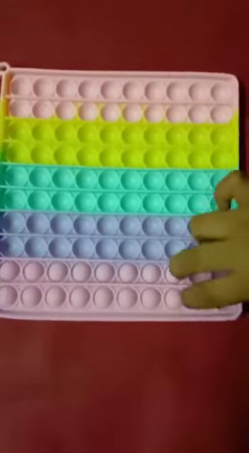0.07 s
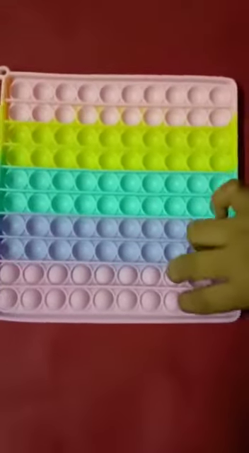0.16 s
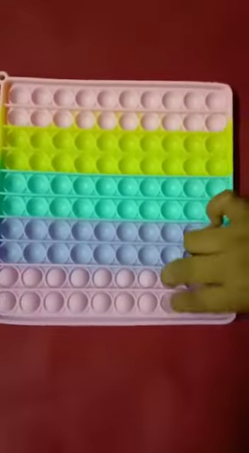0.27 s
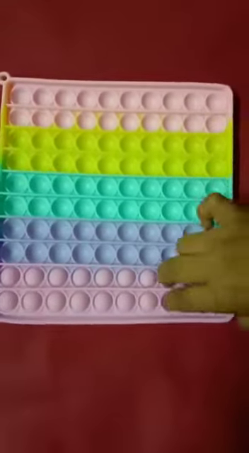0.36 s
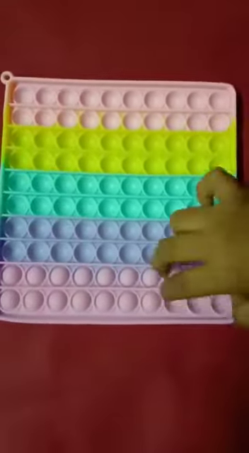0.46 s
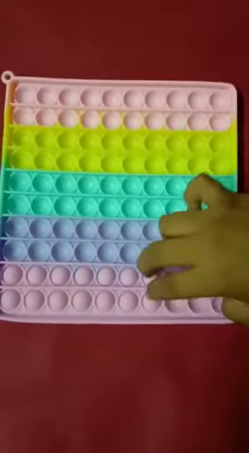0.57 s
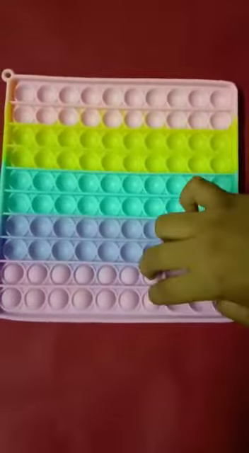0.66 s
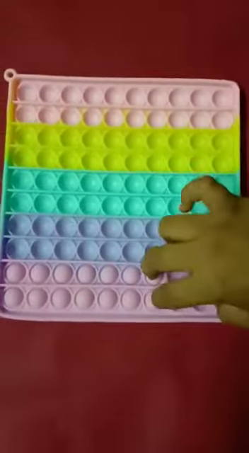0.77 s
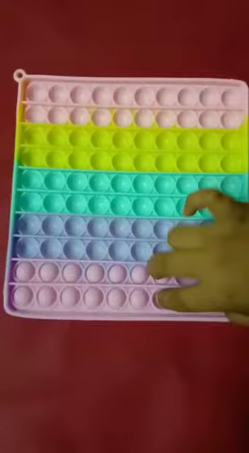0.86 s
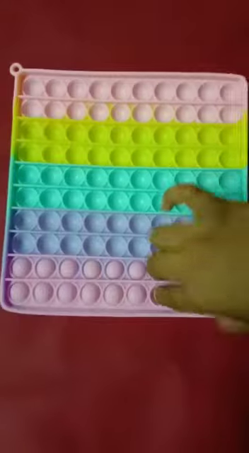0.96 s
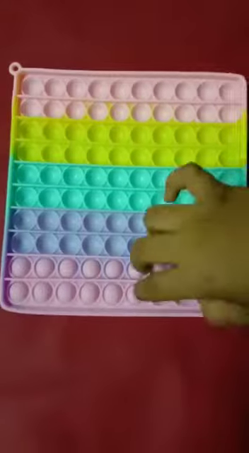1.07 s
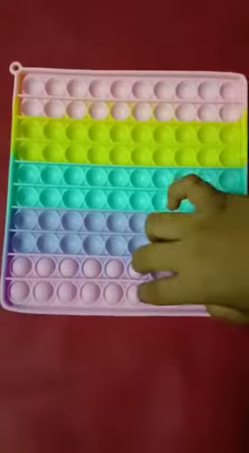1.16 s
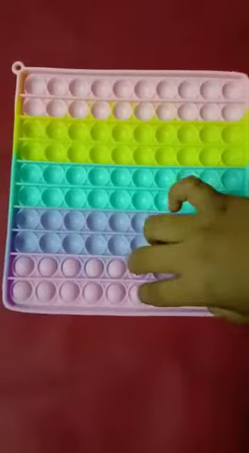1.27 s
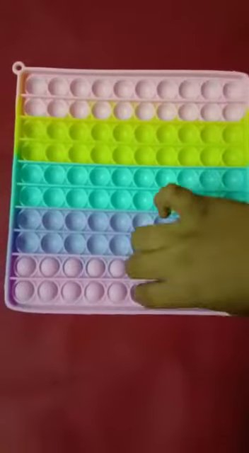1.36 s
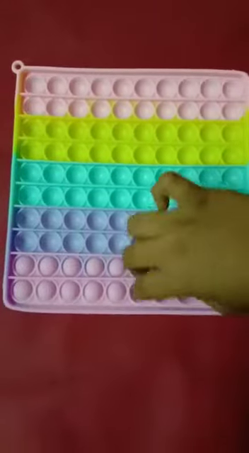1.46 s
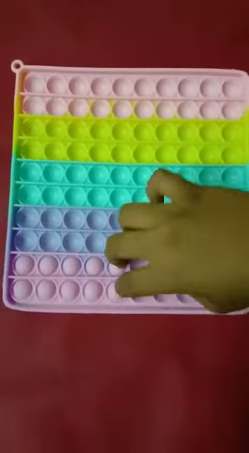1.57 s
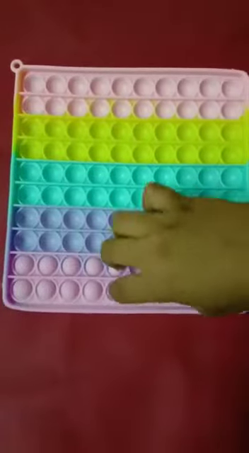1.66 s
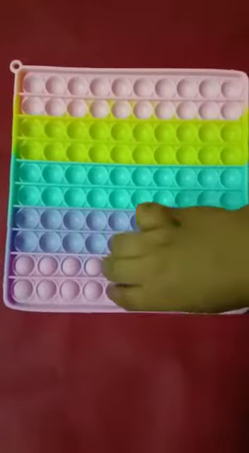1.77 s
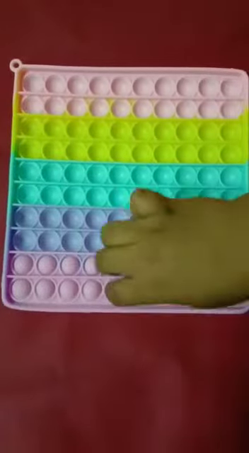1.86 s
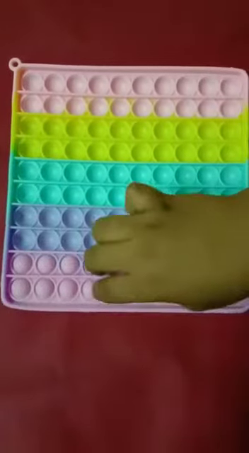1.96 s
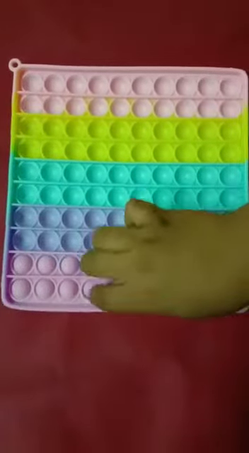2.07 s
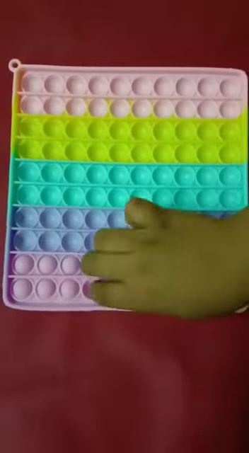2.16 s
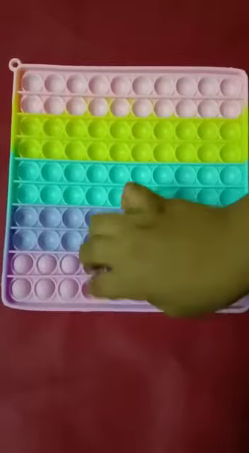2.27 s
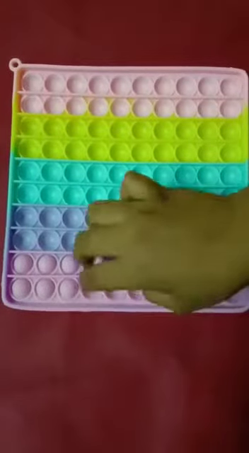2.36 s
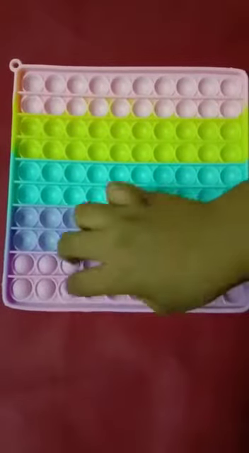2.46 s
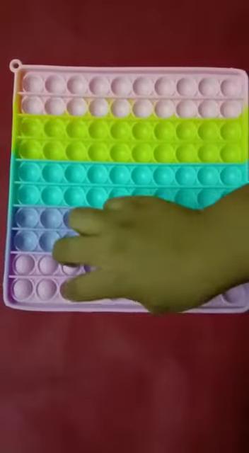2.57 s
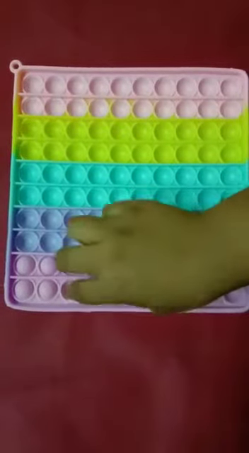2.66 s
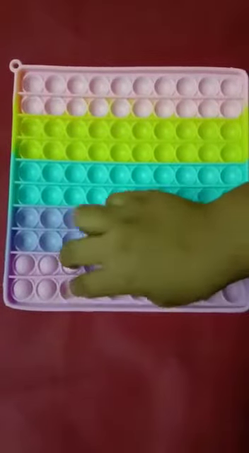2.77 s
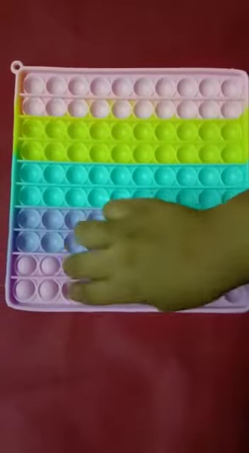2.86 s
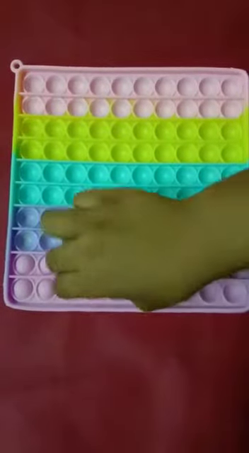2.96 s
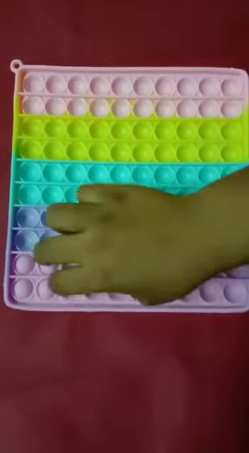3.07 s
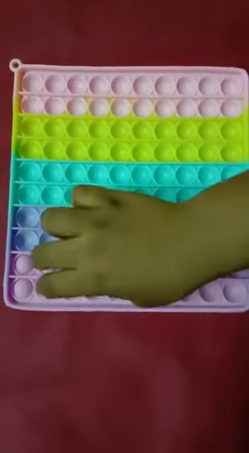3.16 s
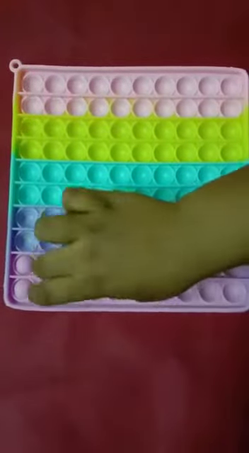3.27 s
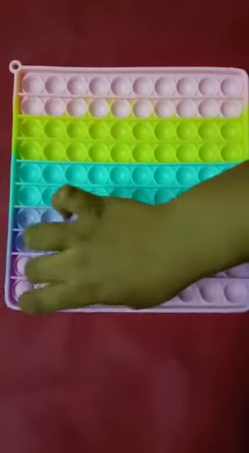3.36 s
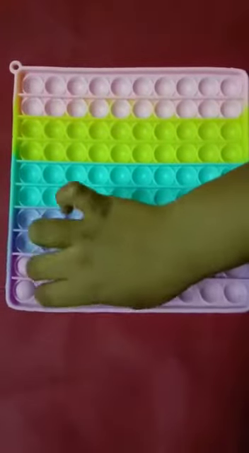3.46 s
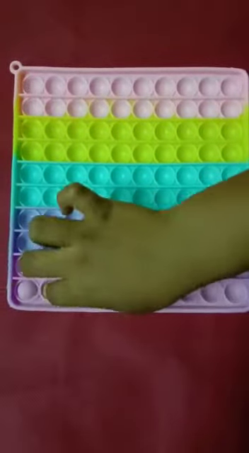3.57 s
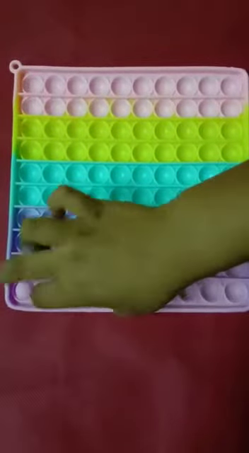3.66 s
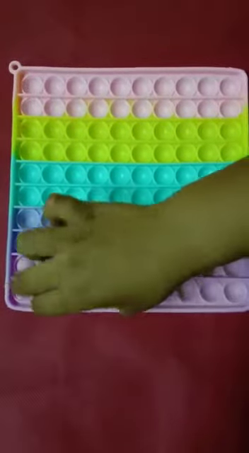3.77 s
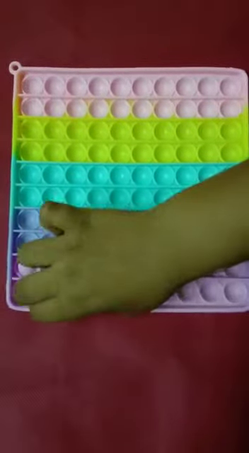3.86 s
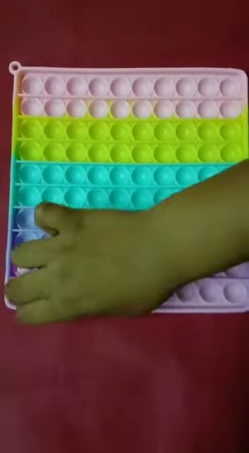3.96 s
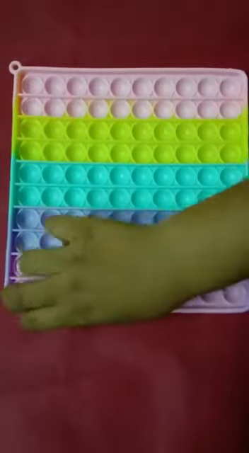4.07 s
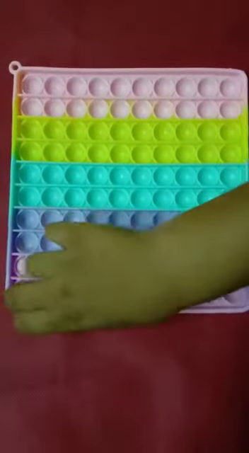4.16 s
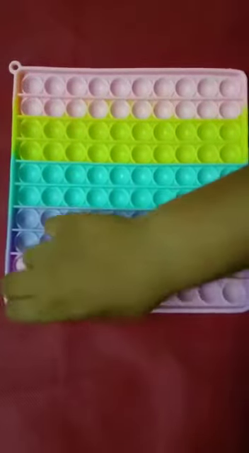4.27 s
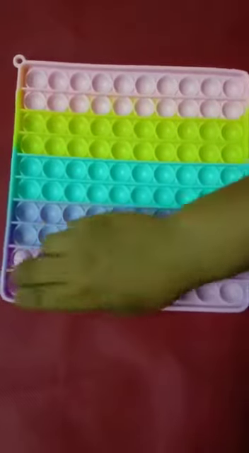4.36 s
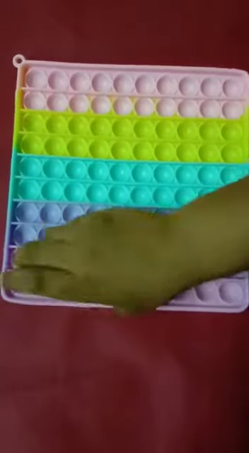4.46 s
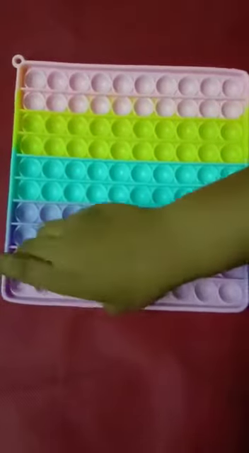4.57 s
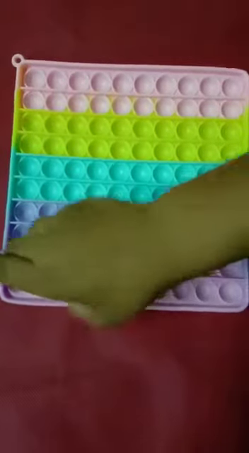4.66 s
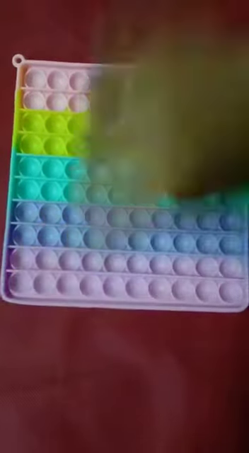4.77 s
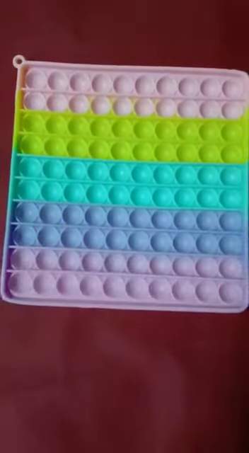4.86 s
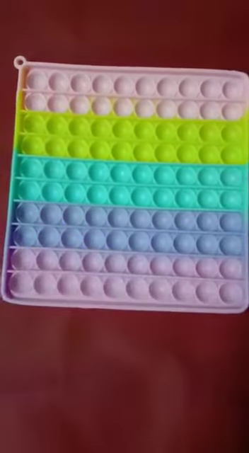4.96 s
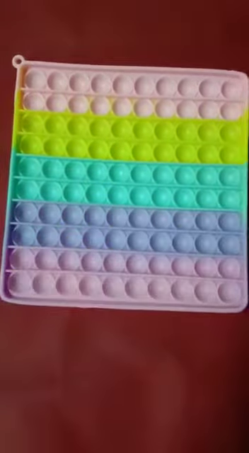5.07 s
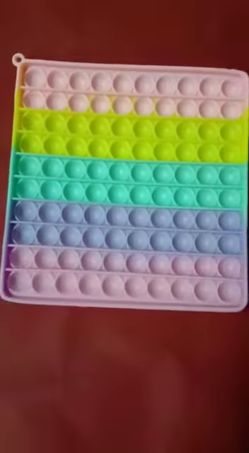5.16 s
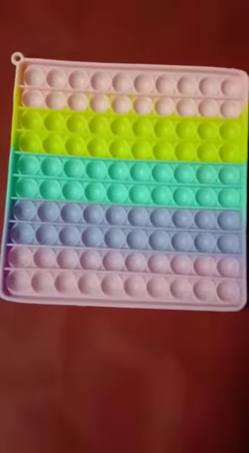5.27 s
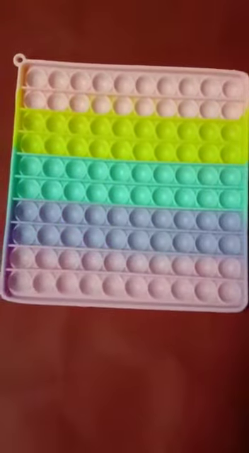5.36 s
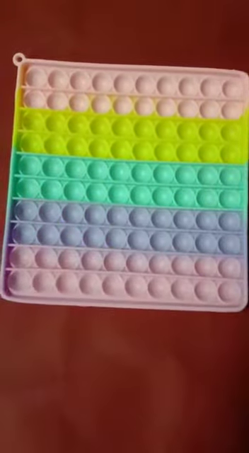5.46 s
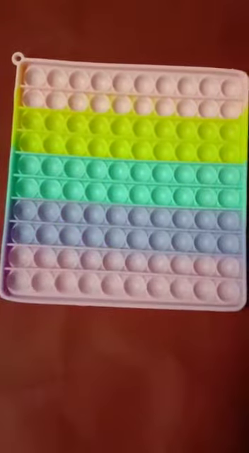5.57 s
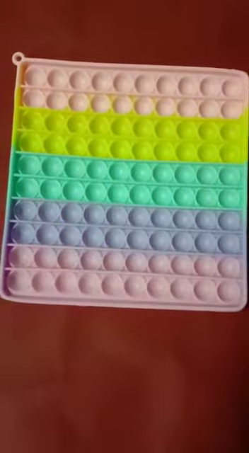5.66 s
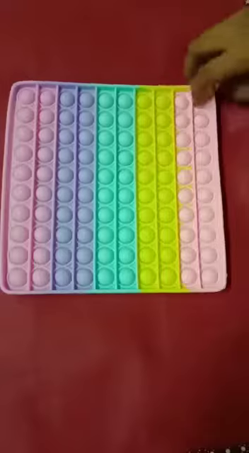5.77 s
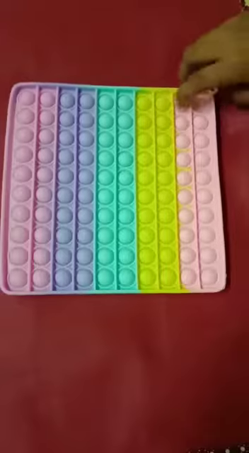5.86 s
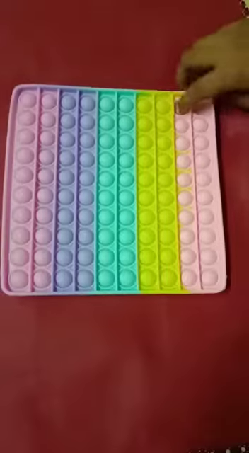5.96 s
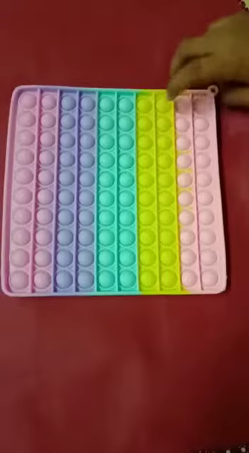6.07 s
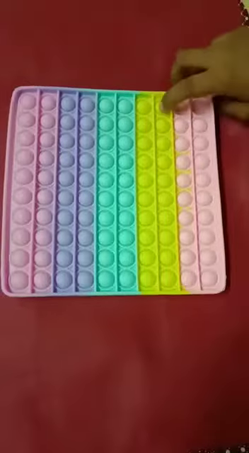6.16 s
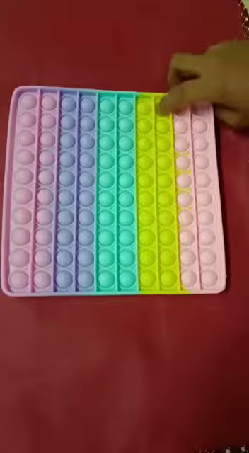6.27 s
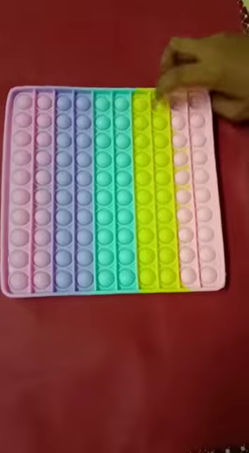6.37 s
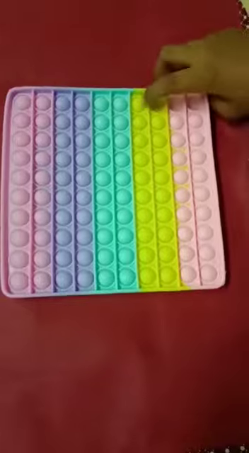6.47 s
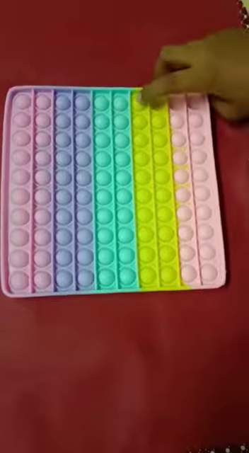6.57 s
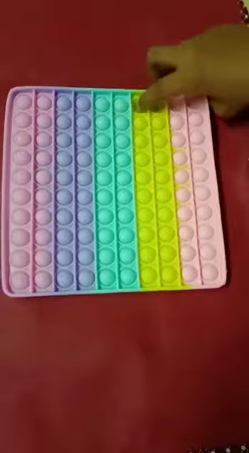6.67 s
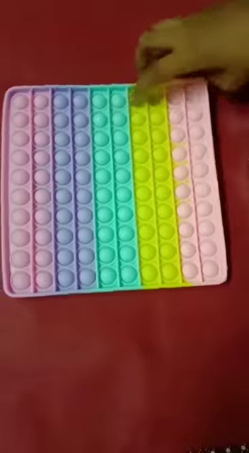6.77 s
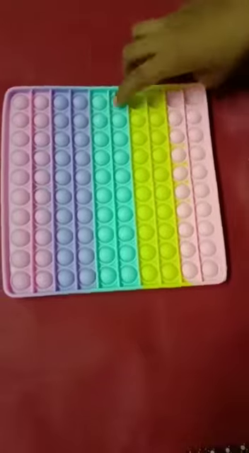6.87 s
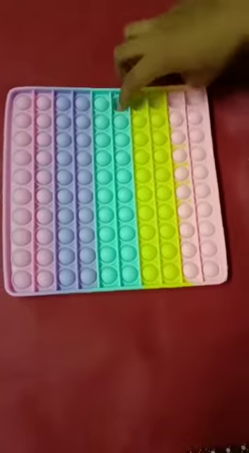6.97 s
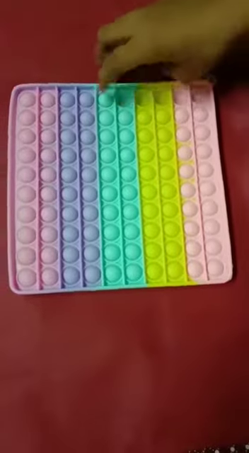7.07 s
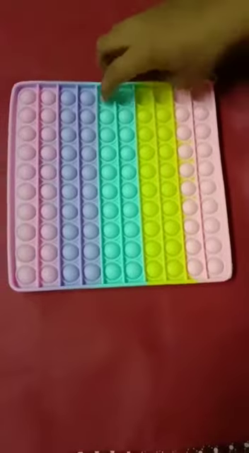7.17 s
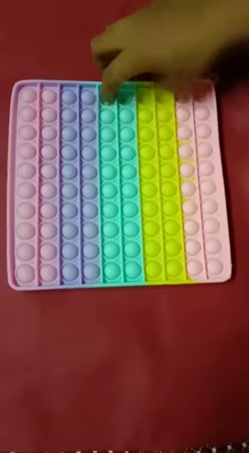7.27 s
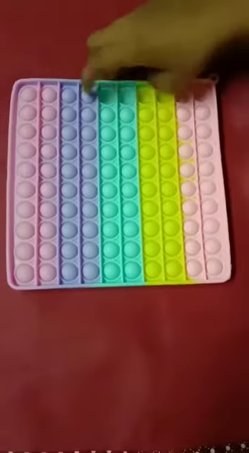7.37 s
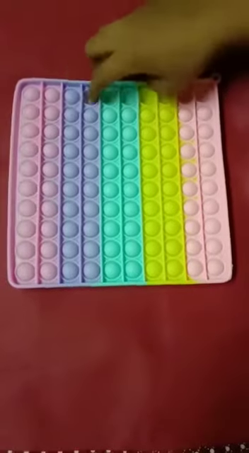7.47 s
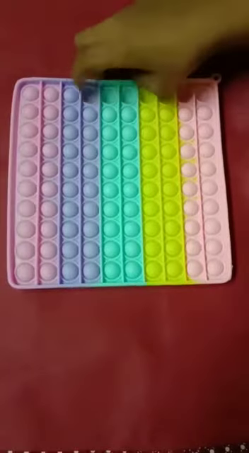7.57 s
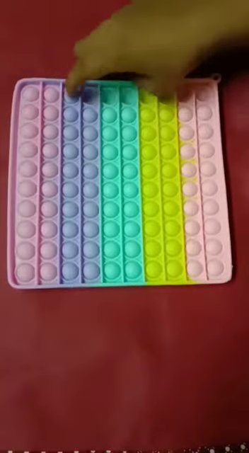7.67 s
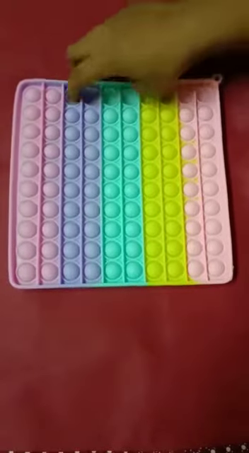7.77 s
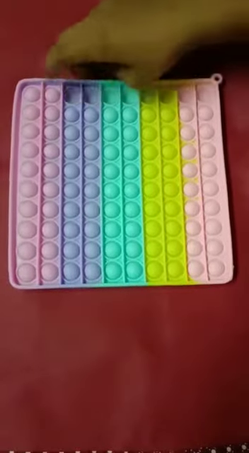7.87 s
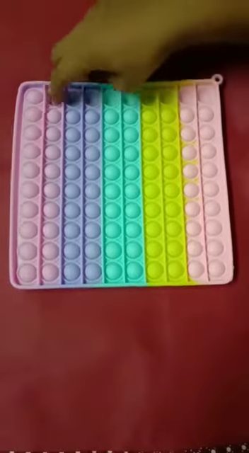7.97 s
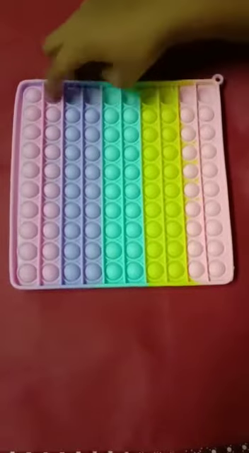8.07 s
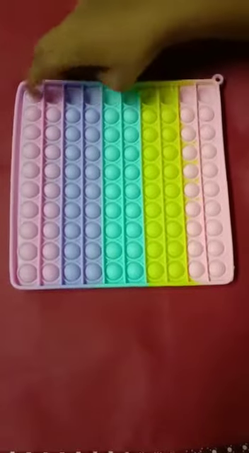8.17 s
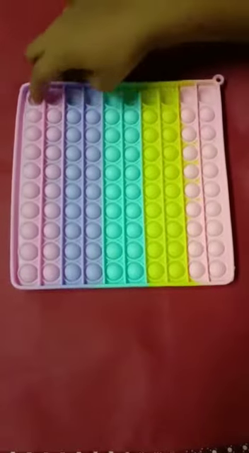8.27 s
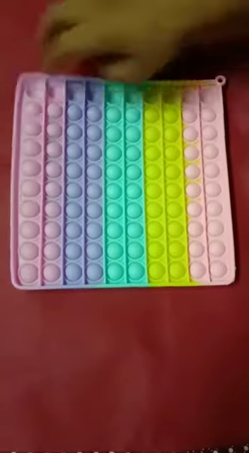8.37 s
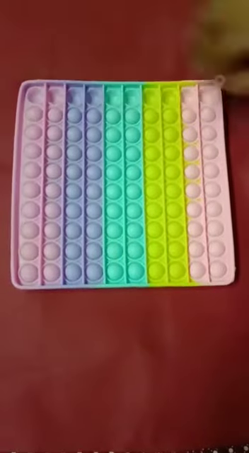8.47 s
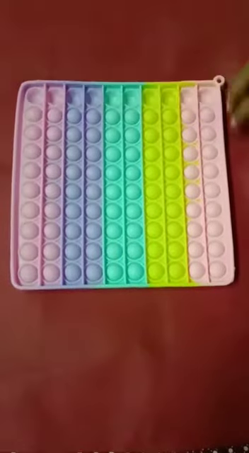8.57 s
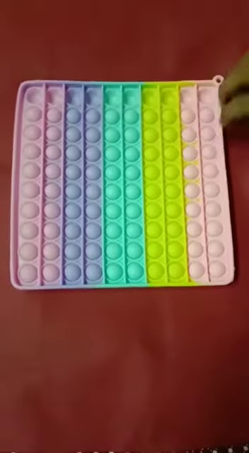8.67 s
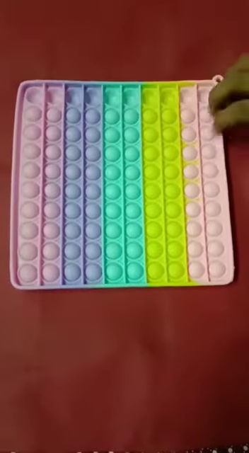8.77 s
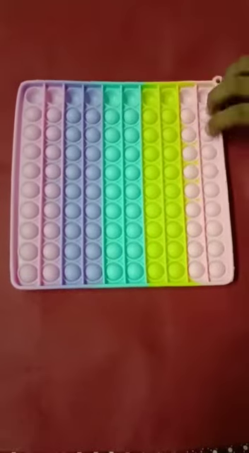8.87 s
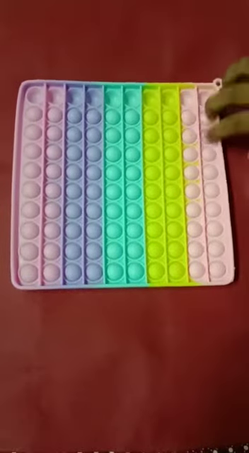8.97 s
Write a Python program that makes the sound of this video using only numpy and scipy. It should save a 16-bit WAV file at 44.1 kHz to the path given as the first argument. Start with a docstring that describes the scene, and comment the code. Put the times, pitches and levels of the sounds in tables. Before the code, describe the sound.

Sharp pops from a silicone bubble toy on a table in a small room, turning softer later amid low microphone rumble.

```python
"""Domes of a silicone fidget sheet pop under the fingers, on a table in a small room.
Each dome snaps through and rings its air pocket; the rubber cracks, the table thuds, the room answers.
Sticky fingertips peel off and a hand slides over the sheet. At 5.7 s the level dips briefly;
softer pops follow over muffled knocks and the rumble of a hand-held phone."""
import sys
import numpy as np
from scipy import signal
from scipy.fft import rfft, irfft, next_fast_len
from scipy.io import wavfile
from scipy.ndimage import uniform_filter1d, minimum_filter1d, map_coordinates

SR = 44100
rng = np.random.default_rng(int(sys.argv[2]) if len(sys.argv) > 2 else 0)


def bounce(signal):
    """Save signal as a 16-bit WAV file at the path given by the first command-line argument."""
    frames = np.transpose(np.atleast_2d(signal))
    limited = np.clip(frames, -1, 1)
    pcm = np.round(limited * 32767).astype(np.int16)
    wavfile.write(sys.argv[1], SR, pcm)


N = 396879

# Each row: start in seconds, level in dB, first mode in Hz, then in dB: offsets of the first, second
# and two highest modes, crack re all modes, treble re crack, room tail re pop, table thud level.
POPS = [(0.291, -24, 1060, -6, -2, -21, -25, -18, -13, -60),
        (0.2957, -9, 990, -5.5, -9.5, -1.5, -30, -27, -8.5, -28.5),
        (0.8624, -25, 1010, -13, -12, -8, -24, -10, 7, -47),
        (0.8736, -20, 1250, -3.5, -6, 0.5, -39, -20, 0.5, -39),
        (0.8894, -13, 814, -4.5, -15.5, -5.5, -34, -14, -2.5, -28.5),
        (0.9015, -24, 1300, 4, 3, -8, -33, -20, -15, -28),
        (1.0049, -35, 1010, -14, -12, -1.5, -18.5, -15, -6, -43),
        (1.3438, -7.5, 1085, -4.5, -16, -2, -27, -17, -9.5, -33),
        (1.73, -1.5, 1060, -12.5, -12.5, -1.5, -26, -9.5, -13.5, -43),
        (1.7504, -14, 1007, 3, -3.5, 3.5, -36, -20.5, -12, -31.5),
        (2.1164, -6.5, 1040, -6.5, -9.5, 4, -29.5, -17.5, -16, -39),
        (2.172, -12, 1006, 2.5, -4, -1, -32, -25.5, -7, -44),
        (2.583, -1.5, 1086, -11, -12, 0.5, -27, -14, -13, -43),
        (2.8732, -13.5, 1043, -5, -7, 2, -30, -29, -1, -41),
        (3.282, -8.5, 1030, -5, -5.5, 3, -27, -27.5, -6.5, -40),
        (3.5205, -3.5, 1138, -2.5, -6.5, -7.5, -30, -23.5, -21.5, -34),
        (4.1779, -18.5, 1059, -5.5, -11.5, -0.5, -17, -10.5, -5, -32),
        (4.5662, -8, 815, -5.5, -7, -1, -23.5, -30.5, -13, -29),
        (5.9233, -30.5, 885, 0.5, 3.5, -9.5, -28, -6, -13.5, -40),
        (6.2288, -27, 855, 3.5, 1, -8, -29, -16, -11, -36.5),
        (6.639, -33.5, 916, 9.5, 8.5, -1.5, -26.5, -10, -12, -38),
        (6.9603, -32, 1296, 6.5, -3, -6, -25, -4.5, -10, -34.5),
        (7.2083, -47, 1400, 1.5, 3, 1, -19, 2, -1, -51),
        (7.222, -50.5, 836, 13, -0.5, -9.5, -22, 0, 2.5, -39),
        (7.4597, -33.5, 1047, 15.5, 12.5, 0.5, -27, 9.5, -15.5, -40),
        (7.7328, -20, 987, 0.5, -2, -8, -27.5, -4, -10.5, -32),
        (7.9873, -27, 984, 8, 3, -7.5, -32.5, -15, -14.5, -32.5),
        (8.2357, -40.5, 1000, 4.5, -0.5, -11.5, -35.5, -3, -8.5, -48),
        (8.987, -42, 1156, 9.5, -8.5, -12.5, -28.5, -11, -3.5, -47)]
# Microphone hiss. Each row: frequency in Hz, density in dB.
HISS = [(2940, -42), (5000, -3.5), (7010, -4.5), (12300, -4.5), (14300, -4.5), (15600, -6), (15750, -43),
        (17000, -60.5)]
HISS_DB = -70


def dome_pops():
    """A snap starts all air-pocket modes at once; near-even spacing makes them beat into a few pulses."""
    # Upper modes. Each row: frequency in Hz, level in dB, time to -60 dB in seconds.
    dome_modes = [(1831, -1, 0.005), (2757, -0.5, 0.0042), (3774, -8.5, 0.0076), (4645, -16, 0.007)]
    # First echoes. Each row: delay in seconds, level in dB.
    walls = [(0.0109, -18.5), (0.0125, -19.5), (.021, -29)]
    out, t = np.zeros(N), np.arange(SR // 50) / SR
    upper_hz, upper_db, upper_t60_s = np.transpose(dome_modes)
    t60_s = np.append(0.0054, upper_t60_s)[:, None]
    for start_s, db, first_hz, first_db, second_db, high_db, crack_db, treble_db, room_db, _ in POPS:
        levels = amp(db + np.append(0, upper_db) + [first_db, second_db, 0, high_db, high_db])[:, None]
        strength = np.linalg.norm(levels)
        detune = 1 + 0.025 * rng.standard_normal(t60_s.shape)  # no two domes are alike
        mode_hz = np.append(first_hz, upper_hz)[:, None] * detune
        phase = 2 * np.pi * mode_hz * (t - .001) + .4 * rng.standard_normal(t60_s.shape)
        pop = (levels * np.sin(phase) * amp(-60 * (t / t60_s) ** 3)).sum(axis=0)
        pop *= 1 - np.exp(-(t / 0.0005) ** 3)
        crack = amp(crack_db) * strength * rubber_crack(t, treble_db)
        first_pulse = pop * np.exp(-(t / 0.0014) ** 4)
        tail = room_tail(strength, first_wall_s=walls[0][0])
        for delay_s, wall_db in walls:
            add(out, start_s + delay_s + rng.normal(0, .0004), amp(wall_db + rng.normal(0, 1.5)) * pop)
        add(out, start_s, pop + crack)
        reverb = signal.fftconvolve(first_pulse + 0.061 * pop + 0.75 * crack, tail)
        add(out, start_s, amp(room_db) * reverb)
    return butter(out, "high", hz=700, order=4)  # a small dome radiates no bass


def rubber_crack(t, treble_db, crack_hz=5500, treble_hz=12600):
    """The rubber's thin crack: a brief noise burst in two bands."""
    def response(f):
        return band(f, crack_hz, 0.26) + amp(treble_db) * band(f, treble_hz, .2) + .05 * (f > crack_hz)
    burst = filtered(unit(rng.standard_normal(len(t))), response)
    return burst * t / 0.00064 * np.exp(1 - t / 0.0011)


def room_tail(strength, first_wall_s):
    """Diffuse tail of unit energy behind each pop; the tails of softer pops end sooner."""
    # Each row: frequency in Hz, gain in dB.
    room_colour = [(520, -15.5), (680, 0), (1100, 1.5), (1900, 4), (2800, -6.5), (3900, 2.5), (4900, 2),
                   (6500, 0), (8500, -13)]
    t = np.arange(SR // 4) / SR
    decay_s = np.clip(0.16 + 0.082 * np.log10(strength), 0.05, 1)
    age = t / decay_s
    tail = coloured(rng.standard_normal(len(t)), room_colour) * amp(-25 * age - 37.4 * age ** 2)
    tail *= np.where(t > first_wall_s, 1, .55)
    return tail / np.linalg.norm(tail)


def thuds():
    """The table thuds under every pop; lone knocks on table and phone are muffled."""
    # Each row: start in seconds, level in dB, first mode in Hz.
    lone_knocks = [(0.509, -28, 142), (0.762, -42.5, 95), (6.345, -27, 106.6), (6.366, -26, 83.5),
                   (7.046, -17.5, 109), (7.069, -28, 87.6), (7.081, -32, 130), (7.09, -15.5, 151),
                   (7.098, -19.5, 99), (7.943, -25.5, 91), (8.042, -27.5, 111)]
    # Each row: frequency in Hz, level in dB.
    table_modes = [(168, -2), (290, 1.5), (460, 0.5)]
    out = np.zeros(N)
    for start_s, db, hz in lone_knocks:
        add(out, start_s, knock(db, [(hz, 0), (2.5 * hz, -3.5)]))
    out = butter(out, "low", hz=610, order=4)
    for start_s, *_, thud_db in POPS:
        add(out, start_s, knock(thud_db, table_modes))
    return butter(out, "high", hz=60, order=2)  # the microphone misses the deepest bass


def knock(db, modes, t60_cycles=6.7):
    """A soft blow: (Hz, dB) modes swell in a quarter cycle and die within a few cycles."""
    hz, mode_db = np.transpose(modes)[..., None]
    cycles = np.arange(SR // 10) / SR * hz
    swell = 1 - np.exp(-(cycles / .2) ** 2)
    decay = amp(db + mode_db - 60 * cycles / t60_cycles)
    return (decay * swell * np.sin(2 * np.pi * cycles)).sum(axis=0)


def finger_peels():
    """Sticky fingertips leave the silicone: noise puffs, a narrow band on a broad one."""
    # Each row: start in seconds, level in dB, centre in Hz, rise time in seconds.
    peels = [(0.442, -57, 2800, 0.0084), (1.488, -54.5, 2660, 0.0047), (1.601, -54.5, 4100, 0.0049),
             (1.638, -56.5, 4400, 0.0044), (2.049, -54, 4400, 0.0022), (2.299, -60, 3520, 0.0094),
             (2.978, -53, 3660, 0.0072), (3.187, -55.5, 2870, 0.0048), (3.621, -56, 3660, 0.0032),
             (3.653, -50.5, 3880, 0.002), (3.794, -51.5, 4150, 0.0049), (4.122, -54.5, 2200, 0.0028),
             (4.683, -61, 2500, 0.006), (5.069, -58.5, 4460, 0.0068), (5.542, -58, 5200, .003),
             (5.568, -50, 4260, 0.011), (5.615, -56, 4800, 0.003), (5.643, -55, 4500, 0.0031)]
    out, t = np.zeros(N), np.arange(SR // 8) / SR
    for start_s, db, hz, rise_s in peels:
        puff = filtered(rng.standard_normal(len(t)),
                        lambda f: band(f, hz, 0.24) + 0.31 * band(f, hz, 0.51))
        age = t / rise_s
        add(out, start_s, amp(db) * unit(puff) * age * np.exp(1 - age))
    return out


def hand_slides(edge_s=.025, lowpass_hz=5200):
    """Uneven friction noise in the resonances between hand and sheet."""
    # Each row: start in seconds, length in seconds, level in dB.
    strokes = [(0.759, 0.27, -53), (0.985, 0.35, -59.5), (4.863, .24, -72)]
    # Each row: centre in Hz, width in Hz, level in dB.
    resonances = [(1341, 82, -6.5), (2160, 380, 2), (2930, 250, -2.5), (3606, 360, -2.5), (4710, 330, -3)]
    def response(f):
        modes = sum((-1) ** k * amp(db) * 1j * f * width / (hz * hz - f * f + 1j * f * width)
                    for k, (hz, width, db) in enumerate(resonances))
        return modes / (1 + (f / lowpass_hz) ** 8)
    t = np.arange(N) / SR
    pressure = sum(amp(db) * np.clip(np.minimum(t - s, s + length_s - t) / edge_s + .5, 0, 1)
                   for s, length_s, db in strokes)
    grains = rng.standard_normal(N) * amp(2.9 * wobble(90))
    return pressure * unit(filtered(grains, response))


def grip_and_room(dip_s=5.735):
    """Lumpy rumble and low-mid murk from the hand on the phone; room noise follows the grip a little."""
    # Each row: time in seconds, rumble in dB, murk in dB.
    grip = [(0, -59.5, -67.5), (.9, -58.5, -67.5), (1.5, -62, -66.5), (1.93, -58, -66), (2.4, -61.5, -67.5),
            (3.6, -63, -65.5), (4.4, -59.5, -66), (4.83, -60.5, -68.5), (5.08, -56, -66.5),
            (5.73, -61, -66), (5.74, -49.5, -63), (6.26, -44, -62), (6.72, -49, -64.5), (7.16, -47.5, -64),
            (7.5, -39.5, -53.5), (7.72, -46.5, -55), (7.93, -39.5, -57.5), (8.25, -46.5, -58),
            (8.55, -41.5, -58.5), (9, -48.5, -64.5)]
    # Four spectra. Each row: frequency in Hz, density in dB.
    rumble_spectrum = [(15, -61), (25, -26.5), (54, -14), (96, -1), (139, -4), (205, -11), (241, -14.5),
                       (330, -28.5), (430, -52), (730, -120)]
    murk_spectrum = [(150, -30.5), (250, -10.5), (382, -7.5), (680, -18.5), (930, -18.5), (1400, -28.5),
                     (1980, -120)]
    early_room = [(410, -23), (700, -1), (841, -13), (935, -3), (1010, -0.5), (1670, -4), (1850, 4.5),
                  (2020, -0.5), (2720, -3.5), (4540, -2.5), (7000, -19.5), (9100, -57.5), (15400, -120)]
    late_room = [(350, -33), (600, -15), (905, -8), (1680, -6), (1820, -7.5), (2610, -9.5), (3660, -8.5),
                 (7000, -20), (9100, -38), (15400, -120)]
    grip_db, murk_db = curves(grip)
    late = np.arange(N) > dip_s * SR
    swing_db = grip_db - np.where(late, grip_db[late].mean(), grip_db[~late].mean())
    room_db = np.where(late, -66.5 + 0.29 * swing_db, -66 + .1 * swing_db) + 0.73 * wobble(3.4)
    lumps = wobble(22)
    rumble = unit(amp(1.7 * wobble(5) + 2 * lumps + 0.5 * wobble(45)) * noise(rumble_spectrum))
    murk = unit(amp(wobble(5) + 1.5 * lumps + wobble(30)) * noise(murk_spectrum))
    room = np.where(late, noise(late_room), noise(early_room))
    return amp(grip_db) * rumble + amp(murk_db) * murk + amp(room_db) * room


def amp(db):
    """dB to gain."""
    return 10 ** (np.asarray(db) / 20)


def unit(x):
    """x at rms 1."""
    return x / np.sqrt(np.mean(x ** 2) + 1e-20)


def curves(rows):
    """One value per sample for each column after the time."""
    times_s, *columns = np.transpose(rows)
    return [np.interp(np.arange(N) / SR, times_s, column) for column in columns]


def wobble(rate_hz):
    """Smooth random curve, rate_hz knots a second."""
    knots = rng.standard_normal(int(N * rate_hz / SR) + 4)
    return map_coordinates(knots, [np.arange(N) * rate_hz / SR])


def band(f, hz, width):
    """Bell around hz on a log frequency axis."""
    return np.exp(-(np.log((f + 1) / hz) / width) ** 2)


def butter(x, kind, hz, order):
    """High- or low-pass filter."""
    return signal.sosfilt(signal.butter(order, hz, kind, fs=SR, output="sos"), x)


def filtered(x, response):
    """x through a response given as a function of Hz."""
    size = next_fast_len(x.shape[-1] + 8192)
    return irfft(rfft(x, size) * response(np.fft.rfftfreq(size, 1 / SR)), size)[..., :x.shape[-1]]


def coloured(x, spectrum):
    """x through a (Hz, dB) spectrum."""
    hz, db = np.transpose(spectrum)
    return filtered(x, lambda f: amp(np.interp(np.log(f + 1), np.log(hz + 1), db)))


def noise(spectrum):
    """Noise of rms 1 with a (Hz, dB) spectrum."""
    return unit(coloured(rng.standard_normal(N), spectrum))


def add(track, start_s, sound):
    """Mixes sound into track."""
    part = track[round(start_s * SR):][:len(sound)]
    part += sound[:len(part)]


def scene():
    """One microphone feeds both channels; only faint noise differs between them."""
    mid = dome_pops() + finger_peels() + thuds() + hand_slides() + grip_and_room()
    mid += amp(HISS_DB) * noise(HISS)
    side = amp(HISS_DB - 17) * noise(HISS)
    side += amp(-68.5) * noise([(100, -10), (300, -8), (1500, -14), (6000, -15.5), (7000, -61.5)])
    return np.array([mid + side, mid - side])


def record(dry):
    """The level dips briefly; a limiter holds the peaks, their tips clip, and the band is limited."""
    # Each row: time in seconds, gain in dB.
    level_dip = [(0, 3), (5.733, 3), (5.737, -21.5), (5.8, -8), (5.9, 1), (6.05, 2)]
    ceiling, top_hz = 1.02, 16570
    dipped = dry * amp(curves(level_dip)[0])
    needed_gain = np.minimum(1, ceiling / (np.abs(dipped).max(axis=0) + 1e-9))
    gain = uniform_filter1d(minimum_filter1d(needed_gain, size=161), size=81)
    limited = np.clip(dipped * gain, -1, 1)
    return np.clip(filtered(limited, lambda f: f < top_hz), -1, 1)


dry = scene()
out = record(dry)
bounce(out)
```